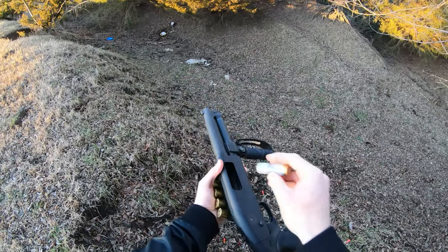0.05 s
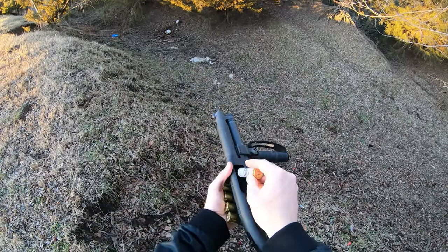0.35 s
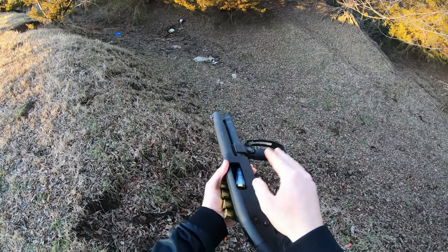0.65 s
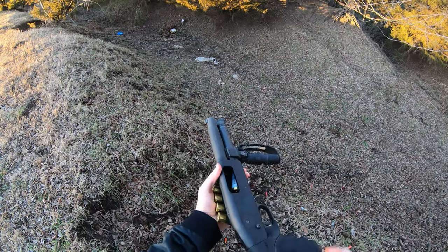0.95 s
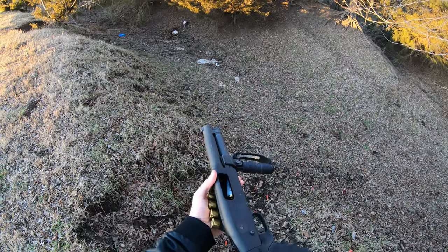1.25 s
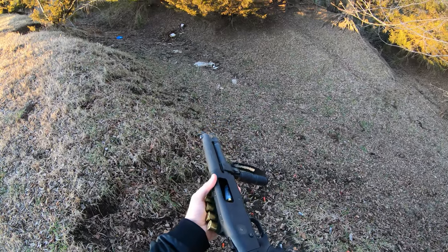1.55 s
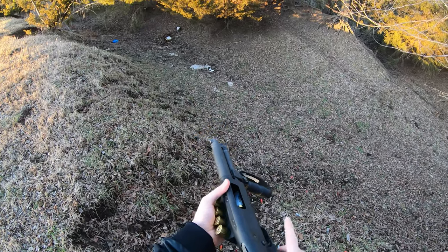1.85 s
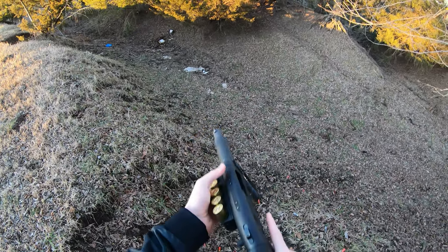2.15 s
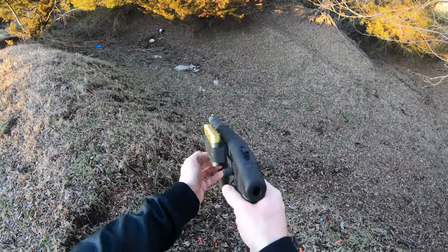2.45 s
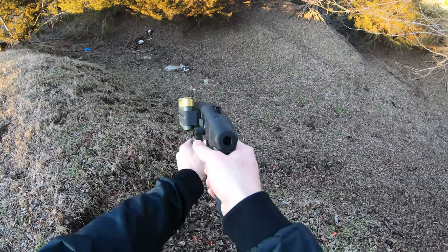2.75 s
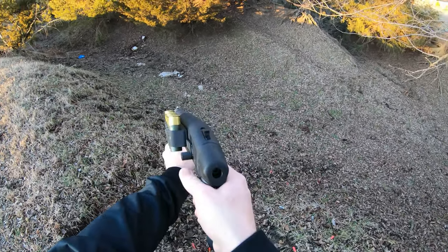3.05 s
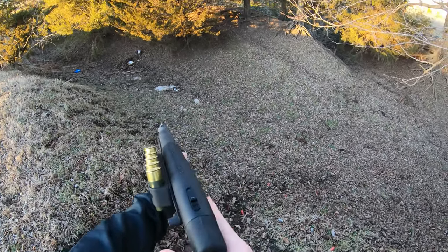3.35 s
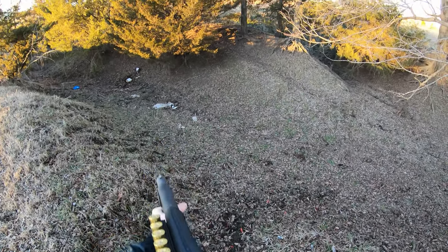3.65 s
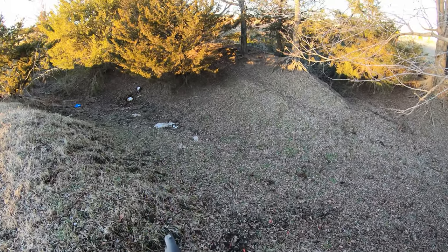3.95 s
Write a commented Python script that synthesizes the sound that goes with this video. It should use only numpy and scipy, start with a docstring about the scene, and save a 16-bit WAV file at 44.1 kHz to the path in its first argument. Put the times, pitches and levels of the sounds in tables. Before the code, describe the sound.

A pump shotgun takes a rattling shell, then its slide clacks shut outdoors.

```python
"""A shell drops into the open port of a pump shotgun and rattles to rest; loose parts tick as the gun
is raised, then the slide scrapes forward and the bolt slams shut, leaving the steel ringing.
Each contact is a crack and a gritty noise burst that excite resonances of the gun.
Outdoors, at arm's length: jacket sleeves swish and a light wind rumbles on the microphone."""
import sys
import numpy as np
from scipy import signal
from scipy.fft import rfft, irfft
from scipy.io import wavfile

SR = 44100
rng = np.random.default_rng(int(sys.argv[2]) if len(sys.argv) > 2 else 0)


def materialize(psi):
    """Save the field psi as 16-bit PCM at rate SR to the path in sys.argv[1].

    A 1-D psi becomes a single channel; in a 2-D psi each row is a channel.
    """
    bounded = np.clip(np.atleast_2d(psi).T, -1, 1)
    quanta = np.round(bounded * 32767).astype(np.int16)
    wavfile.write(sys.argv[1], SR, quanta)


N = 176400
TIME = np.arange(N) / SR


def from_db(db):
    """Decibels to gain."""
    return 10 ** (np.asarray(db) / 20)


def rms_one(x):
    """Scale to rms 1."""
    return x / np.sqrt(np.mean(x ** 2) + 1e-20)


def add(out, start_s, sound):
    """Mix a sound in at start_s."""
    i = int(start_s * SR)
    out[..., i:i + sound.shape[-1]] += sound[..., :N - i]


def stereo(mid, side):
    """Mid and side to left and right."""
    return np.array([mid + side, mid - side])


def band(x, low_hz, high_hz, order=4):
    """Causal band-pass."""
    return signal.sosfilt(signal.butter(order, [low_hz, high_hz], "band", fs=SR, output="sos"), x)


def resonance(x, hz, width_hz):
    """Two-pole resonator, peak gain 1."""
    r = np.exp(-np.pi * width_hz / SR)
    feedback = [1, -2 * r * np.cos(2 * np.pi * hz / SR), r * r]
    return signal.lfilter(np.array([1, 0, -1]) * (1 - r * r) / 2, feedback, x)


def coloured_noise(spectrum):
    """Noise of rms 1 shaped by (Hz, dB) points; 12 dB/octave roll-off outside them."""
    hz, db = np.transpose(spectrum)
    bins_hz = np.maximum(np.arange(N // 2 + 1) * SR / N, 1)
    gain = from_db(np.interp(np.log(bins_hz), np.log(hz), db))
    roll_off = np.minimum(1, bins_hz / hz[0]) ** 2 * np.minimum(1, hz[-1] / bins_hz) ** 2
    return rms_one(irfft(rfft(rng.standard_normal(N)) * gain * roll_off, N))


def drift(rate_hz):
    """Low-passed random wander, rms 1."""
    r = np.exp(-2 * np.pi * rate_hz / SR)
    return rms_one(signal.lfilter([1], [1, -2 * r, r * r], rng.standard_normal(N + SR))[SR:])


def ring(hz, db, t60_s):
    """One freely decaying mode."""
    t = TIME[:SR]
    return from_db(db - 60 * t / t60_s) * np.sin(2 * np.pi * hz * t)


def wind():
    """Rumble on the microphone, dying down over the hush of open air."""
    # spectra: (frequency [Hz], relative density [dB])
    rumble_spectrum = [(20, -13.5), (35, -1), (58, -3), (75, -21), (150, -29.5), (400, -47)]
    air_spectrum = [(90, -13.5), (170, 3), (300, 0), (520, -10.5), (1500, -11), (9000, -16), (10500, -28),
                    (15000, -41)]
    # wind strength: (time [s], gain [dB])
    wind_fall = [(0, 6), (1, 0.5), (3.4, -1.5), (3.8, -15)]
    rumble_db = -67.5 + np.interp(TIME, *np.transpose(wind_fall))
    air_db = -66.5 + 0.05 * drift(rate_hz=8.8)
    out = 0
    for spectrum, db in (rumble_spectrum, rumble_db), (air_spectrum, air_db):
        out += from_db(db) * stereo(coloured_noise(spectrum), from_db(-15) * coloured_noise(spectrum))
    return out


def sleeves():
    """Cloth rubs on cloth: each arm movement swells and fades as a hollow flutter, swish and hiss; one rub,
    from 0.69 s, is the shell scraping in the port."""
    # rubs, mostly arm movements; the row at 0.69 s is the shell scraping in the port: (start [s], length [s],
    # swell [s], hollow pitch [Hz], hollow [dB], swish [dB], hiss [dB])
    rubs = [(-.1, 0.49, 0.44, 199, -65.5, -53.5, -67), (0.166, 0.044, 0.026, 177, -58, -64, -84),
            (0.69, 0.3, 0.074, 453, -62, -57, -70), (1.006, 0.25, 0.18, 367, -63, -59, -69),
            (1.221, 0.2, 0.12, 360, -61.5, -68.5, -99), (1.863, 0.32, 0.21, 236, -73, -64.5, -66),
            (2.319, 0.33, 0.17, 270, -55, -59, -62), (2.524, 0.48, 0.24, 244, -55.5, -54.5, -55),
            (3.049, 0.48, 0.18, 223, -66, -61, -60), (3.683, 0.45, 0.49, 298, -62.5, -61, -63.5)]
    # cloth spectra: (frequency [Hz], relative density [dB])
    swish_spectrum = [(200, -17.5), (500, -6), (750, 1), (1500, 2), (2900, 1), (5200, -4.5), (6300, -16.5),
                      (10000, -18.5)]
    hiss_spectrum = [(3000, -18), (5500, -1.5), (7000, 4.5), (9200, 4.5), (10300, -8.5), (13000, -22.5)]
    hollow, swish_power, hiss_power = 0, 0, 0
    for start_s, length_s, swell_s, hz, hollow_db, swish_db, hiss_db in rubs:
        motion = np.clip(0.5 + np.minimum(TIME - start_s, start_s + length_s - TIME) / swell_s, 0, 1)
        fold = rng.standard_normal((2, N))
        for _ in range(2):
            fold = resonance(fold, hz, width_hz=219)
        hollow += from_db(hollow_db) * motion * rms_one(fold)
        swish_power += (from_db(swish_db) * motion) ** 2
        hiss_power += (from_db(hiss_db) * motion) ** 2
    swish = np.sqrt(swish_power) * [coloured_noise(swish_spectrum) for _ in range(2)]
    hiss = np.sqrt(hiss_power) * [coloured_noise(hiss_spectrum) for _ in range(2)]
    spread = np.interp(TIME, [0.84, 1.76], [0, 1])  # the cloth widens and moves left
    layers = (hollow, 1.5, 2.5, -7), (swish, 0.56, 4.5, -4.5), (hiss, 1.13, 0.5, -11.5)
    out = 0
    for (mid, side), flutter_db, pan_db, side_db in layers:
        flutter = from_db(flutter_db * drift(rate_hz=28))
        grain = from_db(1.5 * drift(rate_hz=182.4))
        pan = from_db(np.array([[pan_db], [-pan_db]]) / 2 * spread)
        out += flutter * grain * pan * stereo(mid, from_db(side_db) * spread * side)
    return out


def contact(modes, levels_db, sides_db, rise_s, hold_s, t60_s, crack_db, direct_db):
    """A crack and a gritty rub excite the modes; level and stereo width are set per band."""
    # edges of the thud, knock, clack and tick bands: (frequency [Hz])
    edges_hz = [120, 700, 2400, 6000, 15500]
    t = TIME[:SR // 8]
    shape, grit_db = (2, len(t)), 3
    envelope = np.minimum(t / rise_s, 1) ** 2 * from_db(-60 * np.maximum(t - hold_s, 0) / t60_s)
    rub = rng.standard_normal(shape)
    grit = from_db(grit_db * np.clip(rng.standard_normal(shape), -2, 2))
    force = rub * grit * envelope + 1e-18
    force[0, int(rise_s * SR / 2)] += 2 * from_db(crack_db)  # impulse, mid channel only
    body = from_db(direct_db) * force
    for hz, width_hz, db in modes:
        body += from_db(db) * resonance(force, hz, width_hz)
    out = 0
    for low_hz, high_hz, db, side_db in zip(edges_hz, edges_hz[1:], levels_db, sides_db):
        part = band(body, low_hz, high_hz)
        energy = np.sum(part ** 2, axis=1, keepdims=True)
        mid, side = part / np.sqrt(energy / (SR / 100))  # energy of 10 ms at rms 1
        out += from_db(db) * stereo(mid, from_db(side_db) * side)
    return out


def tap(modes, levels_db, t60_s, direct_db):
    """A light, brief contact."""
    return from_db(-3.5) * contact(modes, levels_db, sides_db=[-25.5, -21.5, -47.5, -4], rise_s=0.0008,
                                   hold_s=0.001, t60_s=t60_s, crack_db=7, direct_db=direct_db)


def shell():
    """The shell bounces in the port, each tap at its own pitch; the port rings on between taps."""
    # bounces, relative levels: (time [s], t60 [s], pitch [Hz],
    # thud [dB], knock [dB], clack [dB], tick [dB])
    taps = [(0.715, 0.029, 1440, -48.5, -47, -48, -60.5), (0.747, 0.016, 2983, -50.5, -33.5, -26, -48.5),
            (0.759, 0.032, 3736, -58, -38.5, -27.5, -41), (0.7716, 0.022, 3790, -61, -36, -22, -42.5),
            (0.7872, 0.055, 3990, -79, -58, -37.5, -54.5), (0.801, 0.017, 3610, -72.5, -50, -29.5, -61.5),
            (0.8305, 0.028, 5120, -56, -35.5, -38, -37), (0.8474, 0.0068, 3400, -60, -41, -16, -54),
            (0.8776, 0.021, 4900, -57.5, -45.5, -41.5, -51.5), (0.9116, 0.07, 3540, -55, -39, -39, -51),
            (0.9178, 0.017, 3610, -51, -45, -23.5, -38), (0.939, 0.016, 3800, -51, -55, -28, -46.5),
            (0.952, 0.013, 3700, -56.5, -50.5, -38, -58)]
    # shell in the port: (frequency [Hz], width [Hz], gain [dB])
    port_modes = [(491.7, 65, -10.5), (1457, 140, -21.5), (2342, 110, -15.5), (2830, 158, -16),
                  (3520, 240, -5.5), (4900, 256, -19), (9940, 1600, -12), (13230, 1394, -11)]
    # parts left ringing: (time [s], frequency [Hz], level [dB], t60 [s])
    rings = [(.7155, 770, -33, 0.076), (0.747, 1470, -24.5, 0.024), (0.7609, 3847, -30.5, 0.11),
             (0.8326, 3490, -22.5, .05), (.8780, 3550, -29.5, 0.037), (.919, 2290, -29, 0.023),
             (.919, 7800, -27, 0.01)]
    out = np.zeros((2, N))
    for start_s, t60_s, hz, *levels_db in taps:
        modes = [*port_modes, (hz, 190, 0)]
        add(out, start_s, tap(modes, levels_db, t60_s, direct_db=-25))
    out += from_db(-18) * sum(resonance(out + 1e-18, hz, width_hz=16) for hz, _, _ in port_modes)
    for start_s, hz, db, t60_s in rings:
        add(out, start_s, ring(hz, db, t60_s))
    return out


def loose_parts():
    """Fittings tick as the gun is handled: dry, well damped, little weight."""
    # ticks, relative levels: (time [s], t60 [s], pitch [Hz], knock [dB], clack [dB], tick [dB])
    ticks = [(1.116, 0.017, 3520, -50, -44, -48.5), (1.1245, 0.027, 3540, -53, -45, -58),
             (1.1717, 0.012, 3360, -50, -44, -45), (2.163, 0.034, 5300, -55.5, -49, -60),
             (2.6023, 0.031, 3950, -45.5, -37.5, -41.5), (2.994, 0.0079, 5870, -46.5, -59, -40.5),
             (3.1711, 0.0076, 1630, -43, -60, -58), (3.606, 0.032, 3400, -60, -54.5, -60),
             (3.6297, 0.015, 2860, -57, -41.5, -55), (3.7055, 0.012, 4750, -55.5, -44, -52)]
    # loose fittings: (frequency [Hz], width [Hz], gain [dB])
    fitting_modes = [(3600, 410, 0), (4744, 1400, -22), (8420, 630, -6)]
    out = np.zeros((2, N))
    for start_s, t60_s, hz, knock_db, clack_db, tick_db in ticks:
        modes = [*fitting_modes, (hz, 500, 0)]
        thud_db = knock_db - 8.5
        add(out, start_s, tap(modes, (thud_db, knock_db, clack_db, tick_db), t60_s, direct_db=-18.5))
    return out


def slide():
    """Steel rubs and strikes steel; the locking bolt thumps the stock and sets the barrel ringing."""
    # contacts from unlock to lock, relative levels: (time [s], rub [s], pitch [Hz],
    # thud [dB], knock [dB], clack [dB], tick [dB])
    stroke = [(3.2305, 0.00095, 920, -49.5, -36, -36, -36.5),
              (3.2361, 0.0074, 3800, -57, -36, -27.5, -35.5),
              (3.2563, 0.0024, 1400, -45.5, -31.5, -22.5, -24), (3.263, 0.018, 4400, -49, -35.5, -23, -28),
              (3.2777, 0.0054, 3880, -43, -43, -24, -29), (3.2844, 0.0022, 6050, -49, -36, -27, -28.5),
              (3.2927, 0.0071, 700, -56, -43, -30.5, -36), (3.3059, 0.004, 2600, -53, -35.5, -28, -33),
              (3.3194, 0.0053, 4800, -48, -34, -22, -21), (3.3212, 0.0025, 1920, -66, -21.5, -26, -24),
              (3.3274, 0.00067, 530, -27, -35.5, -21.5, -33), (3.3315, 0.00054, 4620, -30, -26, -18.5, -28),
              (3.3386, 0.00067, 3550, -37.5, -29.5, -19.5, -24.5)]
    # receiver and stock: (frequency [Hz], width [Hz], gain [dB])
    receiver_modes = [(244.5, 52, 10), (560, 72, 4), (897, 56, 3.5), (1860, 160, 1.5), (2540, 180, 1.5),
                      (3590, 630, 6), (4100, 330, 5), (4800, 300, 0.5), (5150, 93, 2.5), (8200, 2500, 2)]
    # narrow resonances that give the slide's clatter a metallic ring: (frequency [Hz])
    clatter_ring_hz = [2384, 2542, 3104, 3717, 3865, 4015, 4532, 4712, 4935, 5230]
    # stock thump and barrel ring: (frequency [Hz], level [dB], t60 [s])
    lock_modes = [(164.6, -27, 0.068), (6600, -45, 0.43), (6460, -54, 0.45)]
    lock_s = 3.336
    out = np.zeros((2, N))
    for start_s, rub_s, hz, *levels_db in stroke:
        modes = [*receiver_modes, (hz, 220, 9)]
        scrape = contact(modes, levels_db, sides_db=[-13, -9.5, -19, -2.5], rise_s=0.0016,
                         hold_s=rub_s, t60_s=0.031, crack_db=9, direct_db=-2)
        add(out, start_s, from_db(-2) * scrape)
    out += from_db(-11) * sum(resonance(out + 1e-18, hz, width_hz=50) for hz in clatter_ring_hz)
    for hz, db, t60_s in lock_modes:
        add(out, lock_s, ring(hz, db, t60_s))
    return out


def jolt():
    """The jolt rocks the microphone: two low wobbles, mostly on the right."""
    # wobbles: (centre [s], half length [s], level [dB])
    jolts = [(3.387, 0.022, -30.5), (3.448, 0.019, -40)]
    wobble_hz, left_db = 52.6, -17
    wobble = 0
    for centre_s, half_s, db in jolts:
        t = TIME - centre_s
        wobble += from_db(db) * np.exp(-(t / half_s) ** 2) * np.cos(2 * np.pi * wobble_hz * t)
    return np.array([-from_db(left_db) * wobble, wobble])


def soften_top(x):
    """Microphone treble response: a shelf down, then a low-pass."""
    shelf_hz, shelf_db, low_pass_hz = 9540, -10, 13900
    below = signal.sosfiltfilt(signal.butter(8, shelf_hz, fs=SR, output="sos"), x)
    shelved = below + from_db(shelf_db) * (x - below)
    return signal.sosfilt(signal.butter(3, low_pass_hz, fs=SR, output="sos"), shelved)


def ground_scatter(x, level_db=-31, t60_s=0.41):
    """Faint, dull reflections from the ground and a bank."""
    t = TIME[:SR // 2]
    echo = band(rng.standard_normal((2, len(t))), 251, 7000, order=2) * from_db(-60 * t / t60_s)
    echo /= np.sqrt(np.sum(echo ** 2, axis=1, keepdims=True))
    return from_db(level_db) * signal.fftconvolve(x, echo, axes=1)[:, :N]


def scene():
    """Gun, reflections, microphone jolt, sleeves and wind."""
    gun = soften_top(shell() + loose_parts() + slide())
    return gun + ground_scatter(gun) + jolt() + sleeves() + wind()


def record(dry):
    """Steep treble cut."""
    cutoff_hz = 15900
    return signal.sosfilt(signal.ellip(10, 0.1, 80, cutoff_hz, fs=SR, output="sos"), dry)


dry = scene()
out = record(dry)
materialize(out)
```